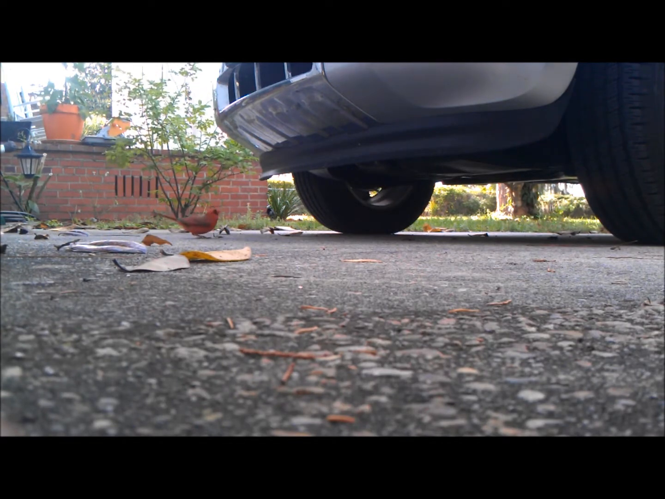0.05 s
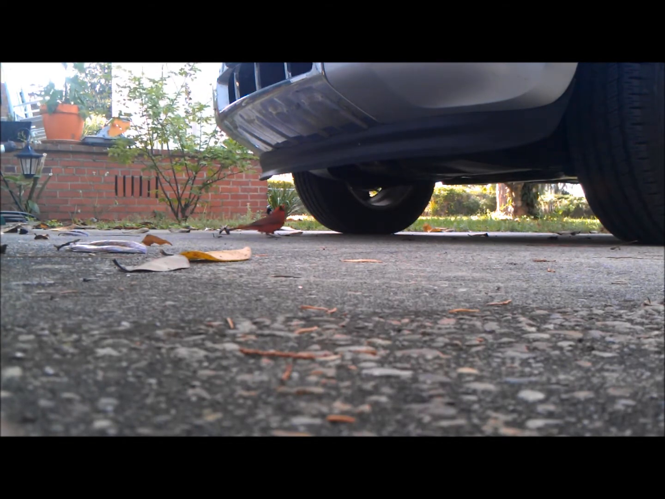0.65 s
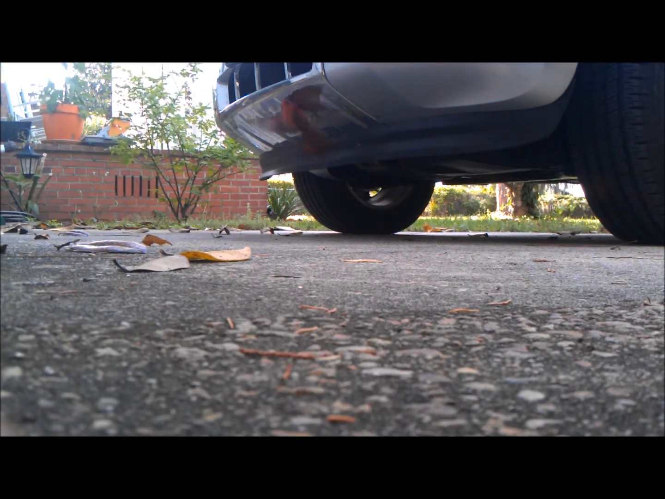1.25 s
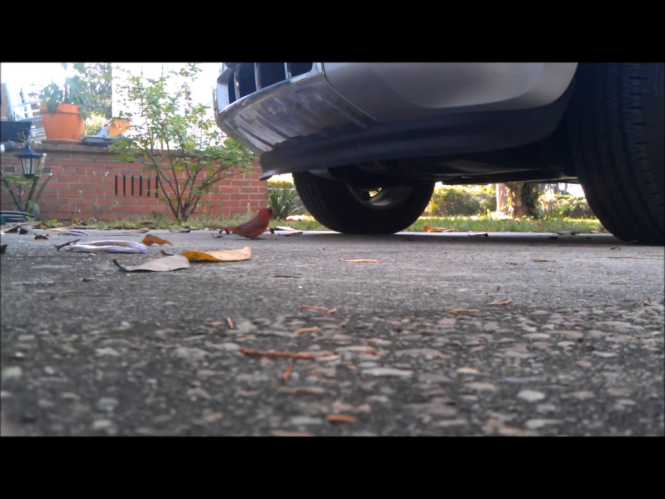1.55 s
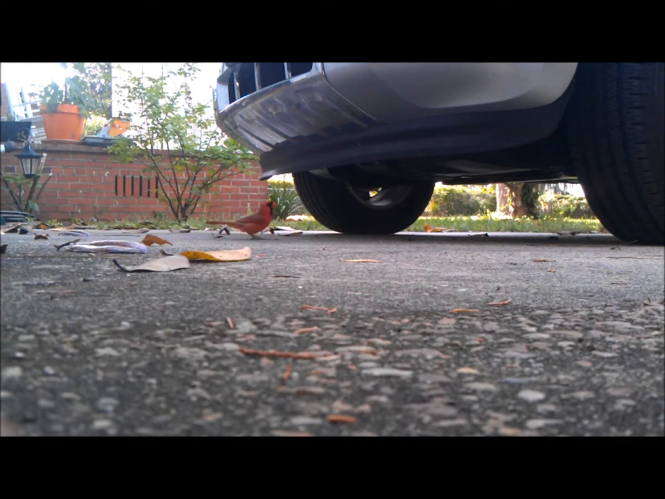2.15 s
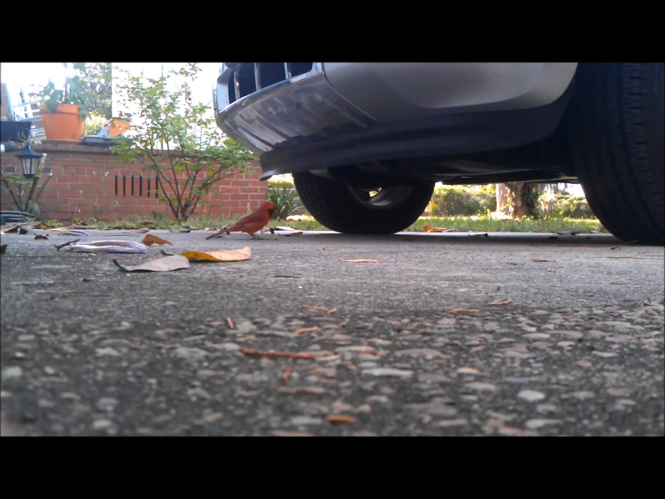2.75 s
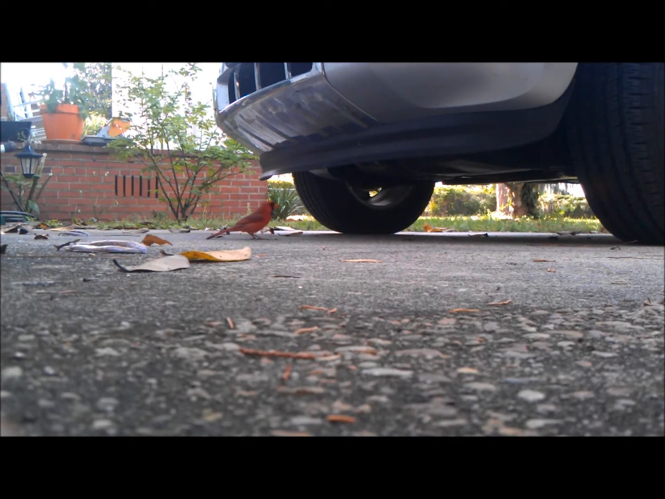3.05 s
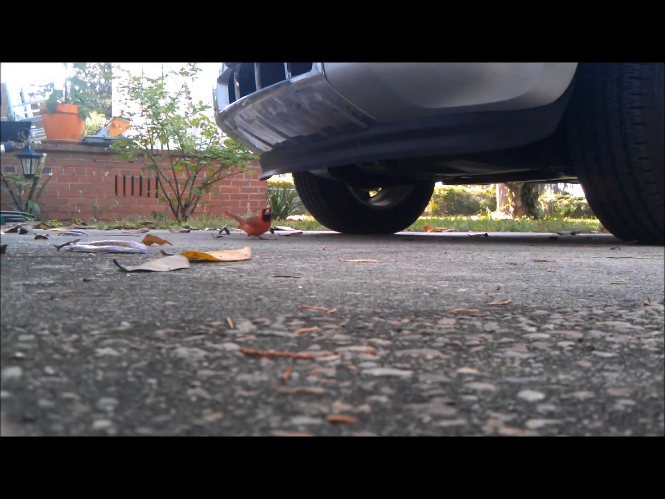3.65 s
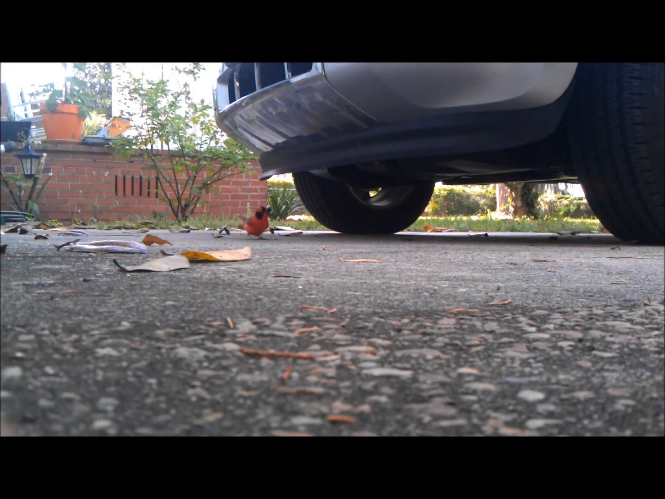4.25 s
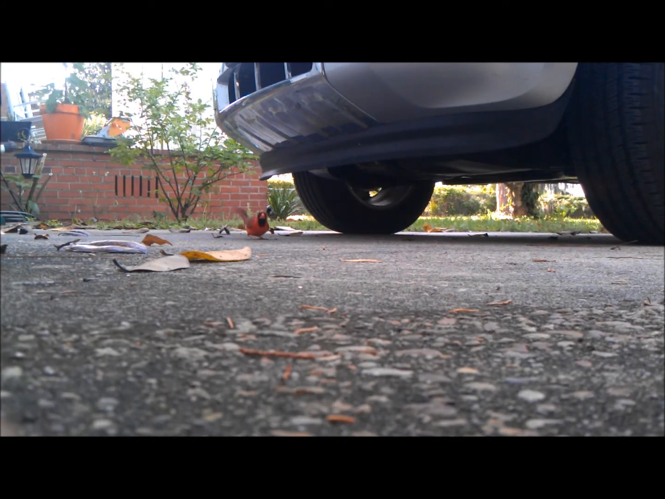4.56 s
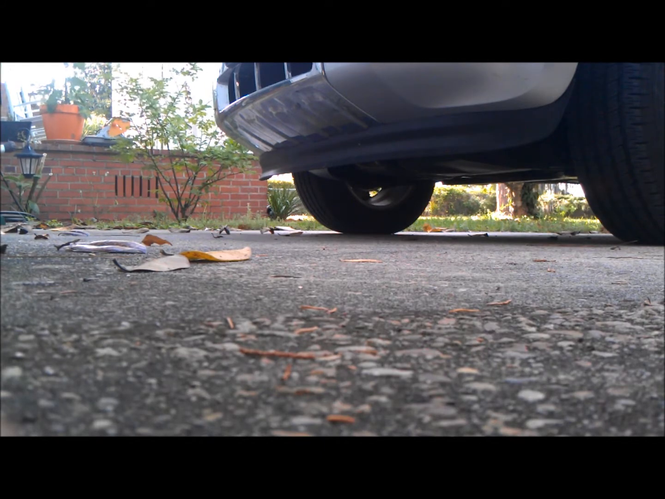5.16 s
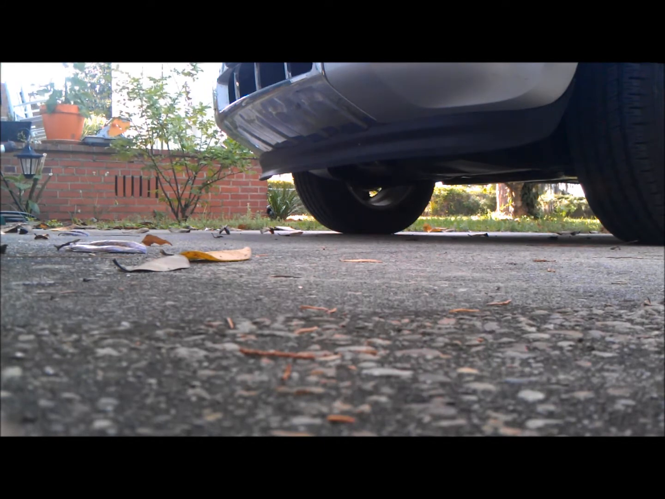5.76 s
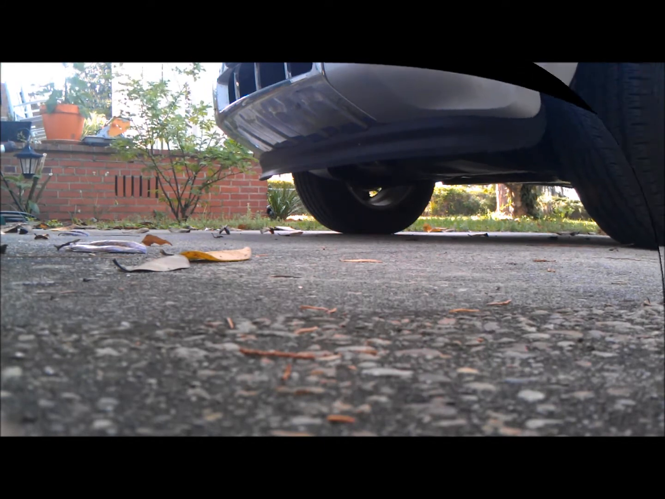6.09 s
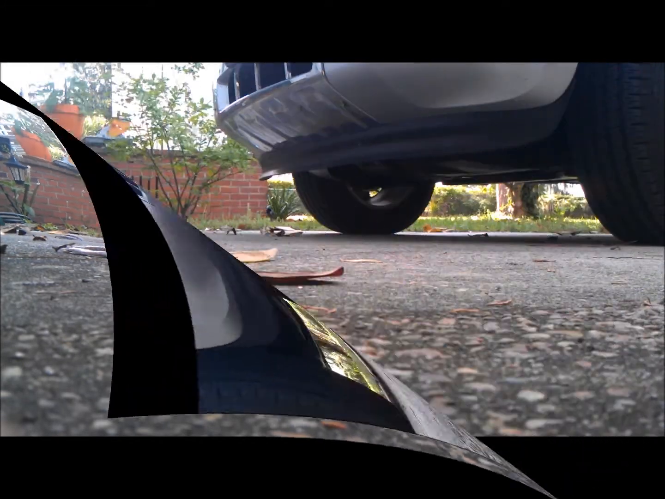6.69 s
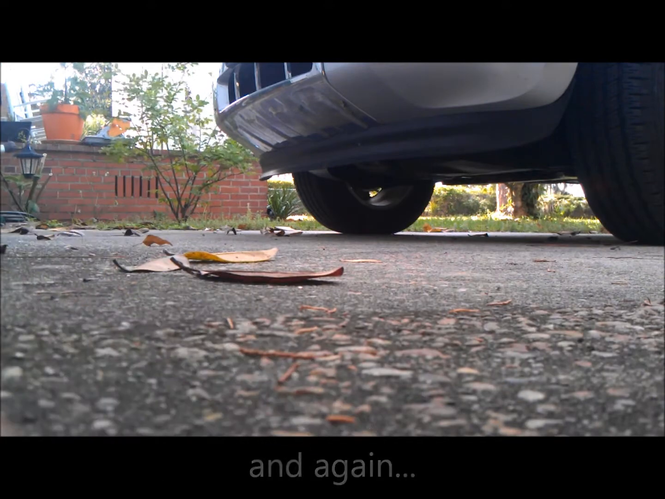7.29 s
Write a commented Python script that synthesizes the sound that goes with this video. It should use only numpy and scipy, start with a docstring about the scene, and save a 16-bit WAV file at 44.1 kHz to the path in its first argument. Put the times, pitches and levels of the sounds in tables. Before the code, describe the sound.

In a driveway, heard from the ground, low handling bumps open on the microphone and a bird gives one loud, sharp chip. Small birds twitter thinly while a beak knocks once on a plastic car bumper. A hoarse, mewing bird calls twice. Later, soft wingbeats flutter away and far birds call briefly, over a low rumble, light wind puffs and a hush of distant traffic.

```python
"""A cardinal whistles one sharp chip, strikes a car's plastic bumper and later flutters off.
Heard from the ground in a driveway: the beak sets the panel ringing, the wings push air and brush
feather on feather. Small birds twitter, a catbird-like mew sounds twice, hoarse from the two sides
of the syrinx drifting apart, and far birds call through their echoes. Low thumps on the microphone,
handling bumps at first and then puffs of wind, sit over a rumble and a hush of distant traffic."""
import sys
import numpy as np
from scipy import signal
from scipy.fft import rfft, irfft, next_fast_len
from scipy.io import wavfile
from scipy.ndimage import map_coordinates

SR = 44100
rng = np.random.default_rng(int(sys.argv[2]) if len(sys.argv) > 2 else 0)


def bounce(signal):
    """Save signal as a 16-bit WAV file at the path given by the first command-line argument."""
    frames = np.transpose(np.atleast_2d(signal))
    limited = np.clip(frames, -1, 1)
    pcm = np.round(limited * 32767).astype(np.int16)
    wavfile.write(sys.argv[1], SR, pcm)


N = 332073


def amp(db):
    """Decibels to gain."""
    return 10 ** (np.asarray(db) / 20)


def unit(x):
    """Scale to rms 1."""
    return x / np.sqrt(np.mean(x ** 2) + 1e-20)


def along(points, hz):
    """Read an EQ curve at hz, on a log frequency axis."""
    f, db = np.transpose(points)
    return np.interp(np.log(hz + 1), np.log(f + 1), db)


def curves(rows):
    """Breakpoints to automation: one curve for each column after the time."""
    times, *columns = np.transpose(rows)
    return [np.interp(np.arange(N) / SR, times, column) for column in columns]


def clock(length):
    """Sample times of a short sound."""
    return np.arange(int(length * SR)) / SR


def add(track, s, sound):
    """Mix a sound into a track at s seconds."""
    room = track[max(0, round(s * SR)):][:len(sound)]
    room += sound[:len(room)]


def wobble(rate):
    """Smooth random modulation, rate knots a second."""
    knots = rng.standard_normal(int(N * rate / SR) + 4)
    return map_coordinates(knots, [np.arange(N) * rate / SR])


def noise(spectrum, size=N):
    """Coloured noise of rms 1."""
    m = next_fast_len(size + 8192)
    eq = amp(along(spectrum, np.fft.rfftfreq(m, 1 / SR)))
    return unit(irfft(rfft(rng.standard_normal(m)) * eq, m)[:size])


def burst(spectrum, length):
    """Noise that swells fast and fades, with the energy of rms 1 held for length seconds."""
    u = clock(.25) / length
    shaped = noise(spectrum, size=len(u)) * u ** 2 * np.exp(-4 * u)
    return shaped * np.sqrt(length * SR / np.sum(shaped ** 2))


def reverb(x, t60, delay):
    """Wet signal only: a diffuse tail of unit energy after a pre-delay."""
    t = clock(1)
    tail = rng.standard_normal(len(t)) * amp(-60 * t / t60) * (t > delay)
    return signal.fftconvolve(x, tail / np.linalg.norm(tail))[:N]


def glides(rows, rough):
    """Short sliding whistles whose pitch and level tremble."""
    out, tremble, flicker = np.zeros(N), wobble(700), amp(2.2 * wobble(400))
    for s, start_hz, end_hz, length, db in rows:
        u = clock(length) / length
        at = round(s * SR) + np.arange(len(u))
        hz = start_hz * (end_hz / start_hz) ** u * (1 + rough * tremble.take(at, mode="clip"))
        phase = 2 * np.pi * np.cumsum(hz) / SR
        swell = np.sqrt(np.sin(np.pi * u))
        add(out, s, amp(db) * swell * (np.sin(phase) + amp(-27) * np.sin(2 * phase)))
    return out * flicker


# fader ride of the rumble: t/s, relative level/dB
RUMBLE_RIDE = [(0.0, -40.5), (0.17, -37.5), (0.27, -39.5), (0.4, -46.5), (0.58, -50), (1.7, -55.5),
               (2.12, -51.5), (2.56, -54.5), (2.87, -53.5), (3.58, -60), (5.22, -64.5), (6.5, -67),
               (7.09, -64), (7.53, -64)]
# low thumps, handling bumps up to 0.45 s and then wind: t/s, level/dB, length/s
THUMP_CUES = [(0.091, -26.5, 0.017), (.118, -28, 0.027), (.198, -29.5, 0.014), (0.296, -29, 0.013),
              (0.376, -35, 0.014), (0.408, -34.5, 0.044), (0.439, -33.5, 0.022), (0.592, -39.5, 0.03),
              (0.854, -32, .011), (0.909, -37, 0.025), (1.237, -42.5, 0.041), (1.63, -41.5, .026),
              (2.03, -46, 0.025), (2.109, -46.5, 0.02), (2.37, -45.5, 0.025), (2.914, -45.5, .02),
              (2.985, -48, 0.019), (3.882, -48.5, 0.021), (6.831, -51.5, .02)]
# bass-heavy colours of the rumble and of a thump: f/Hz, level/dB
RUMBLE_EQ = [(20, -41.5), (45, -21.5), (75, -5), (125, 3), (185, -1), (270, -9.5), (400, -22), (800, -41.5),
             (2000, -79.5)]
THUMP_EQ = [(25, -59.5), (55, -25), (90, -9.5), (135, 5), (200, 2), (280, -6.5), (400, -19), (800, -46.5),
            (2000, -85.5)]

def handling_and_wind(trim_db=2, lumpy_db=3):
    """Low thumps on the microphone: handling bumps at first, then puffs of wind, over a lumpy rumble."""
    ride_db, = curves(RUMBLE_RIDE)
    rumble = unit(noise(RUMBLE_EQ) * amp(lumpy_db * wobble(22)))
    out = amp(ride_db + trim_db) * rumble
    for s, db, length in THUMP_CUES:
        add(out, s, amp(db) * burst(THUMP_EQ, length))
    return out


# fader rides of the bed: t/s, relative traffic level/dB, relative hiss level/dB
BED_RIDE = [(0.0, -53.5, -68.5), (0.73, -53.5, -65), (3.12, -55.5, -67), (3.42, -57.5, -70.5),
            (4.78, -61, -72.5), (5.41, -61, -70), (5.62, -64, -74.5), (5.98, -66.5, -78.5),
            (6.58, -67.5, -80), (7.34, -62.5, -76), (7.53, -60.5, -73)]
# colours of the dull traffic and the airy hiss: f/Hz, level/dB
TRAFFIC_EQ = [(120, -29), (200, -5), (317, -7.5), (504, -5.5), (671, -6), (953, -6), (2860, -15.5),
              (3930, -21), (5760, -23), (9000, -30.5), (11700, -60), (19800, -120)]
HISS_EQ = [(3000, -11.5), (6000, -1), (9000, -5), (10450, 6.5), (11200, -2), (13000, -2), (14000, 1.5),
           (14700, -5), (15800, -5.5)]

def traffic_bed(traffic_trim_db=1, hiss_trim_db=2):
    """Distant traffic under a fine hiss; both sink slowly and come back up a little."""
    traffic_db, hiss_db = curves(BED_RIDE)
    traffic = amp(traffic_db + traffic_trim_db + .4 * wobble(4.7)) * noise(TRAFFIC_EQ)
    hiss = amp(hiss_db + hiss_trim_db) * noise(HISS_EQ)
    return traffic + hiss


# pitch arch and envelope, one list for each mew: t/s, f/Hz, relative level/dB
MEW_CONTOURS = [
    [(.39, 1080, -71), (.445, 1298, -42.5), (.49, 1302, -43), (.57, 1290, -40), (.62, 1237, -45),
     (.67, 1163, -43), (.71, 1106, -49), (.75, 1040, -62)],
    [(2.88, 1030, -67), (2.94, 1160, -52.5), (2.98, 1197, -47.5), (3.035, 1257, -44.5), (3.1, 1210, -58),
     (3.15, 1180, -41.5), (3.2, 1132, -50), (3.26, 1004, -59)],
]
# formants of the mewing bird's throat: f/Hz, level/dB
THROAT_EQ = [(1300, -40), (2300, -4), (2700, -5.5), (3750, -8.5), (4900, 0), (6100, -19), (8400, -23),
             (11000, -27)]

def mews():
    """Hoarse cries with a raspy attack: the two sides of the syrinx drift apart in one throat."""
    out, t = np.zeros(N), np.arange(N) / SR
    rasp_eq = [(1500, -30), (2500, -2), (6500, -2.5), (8500, -8.5), (12000, -26)]
    for contour in MEW_CONTOURS:
        pitch, db = curves(contour)
        start, end = contour[0][0], contour[-1][0]
        gate = (t > start) & (t < end)
        for drift, side_db in [(.003, 0), (.04, -3.5)]:  # steady side, wandering side
            hz = (pitch * (1 + drift * wobble(16) + .009 * wobble(600)))[gate]
            phase = 2 * np.pi * np.cumsum(hz) / SR
            effort = amp(db + side_db + 3 * wobble(80))[gate]
            voice = sum(amp(along(THROAT_EQ, k * hz)) * np.sin(k * phase) for k in range(1, 9))
            out[gate] += effort * voice
        add(out, start + .017, amp(-52) * burst(rasp_eq, length=.06))
    return amp(-7) * out + amp(-9) * reverb(out, t60=.35, delay=.018)


# sweep and envelope of the chip: t/s, f/Hz, level/dB
CHIP_CONTOUR = [(0.5265, 5330, -48.5), (.528, 6380, -12), (.529, 7030, -7), (0.5307, 7800, -13.5),
                (.532, 7880, -17), (0.535, 8650, -18), (0.538, 8610, -43)]
# its second harmonic against the fundamental: f/Hz, level/dB
OVERTONE_EQ = [(10600, -9), (11800, -26), (12500, -24.5), (13800, -25), (15000, -16)]

def cardinal_chip():
    """A thin tick opens a fast upward whistle that bounces between paving and car underside."""
    hz, db = curves(CHIP_CONTOUR)
    t = np.arange(N) / SR
    start, end = CHIP_CONTOUR[0][0], CHIP_CONTOUR[-1][0]
    gate = (t > start) & (t < end)
    phase = 2 * np.pi * np.cumsum(hz) / SR
    overtone = amp(along(OVERTONE_EQ, 2 * hz)) * np.sin(2 * phase)
    note = amp(db) * gate * (np.sin(phase) + overtone)
    tick_eq = [(8000, -38.5), (9800, -11), (10600, 4), (11700, -22), (12500, -5.5), (16000, -14.5)]
    add(note, start, amp(-38.5) * burst(tick_eq, length=.0034))
    early = amp(2) * reverb(note, t60=.11, delay=.004)
    tail = amp(-16.5) * reverb(note, t60=.37, delay=.02)
    return note + early + tail


# twitter notes: t/s, start f/Hz, length/s, level/dB
TWITTER_CUES = [(0.748, 6840, .015, -41), (0.854, 6770, 0.018, -43.5), (0.977, 6220, 0.028, -45.5),
                (1.117, 5360, 0.027, -53.5), (1.32, 6840, 0.009, -43), (1.372, 7540, 0.0099, -37),
                (1.449, 7040, 0.0088, -34.5), (1.557, 6800, 0.015, -42), (1.734, 6050, 0.0097, -45),
                (1.788, 7180, 0.013, -39.5), (1.808, 7500, .014, -43), (1.885, 7100, 0.025, -42.5),
                (1.91, 7140, .024, -45), (1.986, 5570, 0.014, -47.5), (2.032, 5750, 0.029, -44.5),
                (2.057, 5840, 0.022, -46), (2.16, 4480, 0.009, -57), (2.253, 4400, .01, -58)]

def twitter(fall_octaves=.47, typical_hz=6440, fall_exponent=1.213):
    """Thin, scratchy falling notes from the shrubs, with a slapback from the brick wall."""
    rows = []
    for s, hz, length, db in TWITTER_CUES:
        octaves = fall_octaves * (hz / typical_hz) ** fall_exponent  # higher notes fall further
        rows.append((s, hz, hz / 2 ** octaves, length, db))
    notes = glides(rows, rough=.018)
    out = notes + amp(-6.5) * reverb(notes, t60=.32, delay=.002)
    add(out, .033, amp(-12) * notes)  # slapback
    return out


# modes of the plastic panel: f/Hz, relative level/dB, t60/s
BUMPER_MODES = [(177, -11, .25), (230, -11, .18), (290, -14, .14), (327, -13, .14), (390, -14, .12),
                (500, -1.5, .14), (565, -10, .13), (650, -11, .13), (711, -8, .14), (785, -9, .14),
                (863, -8, .14), (912, -7, .14), (964, -4, .15), (1214, -3, .12), (1303, -8, .12),
                (1408, -5, .13), (1467, -3.5, .14), (1532, -7, .13), (1998, -5, .13), (2116, -7, .07),
                (2318, -8, .1), (2546, -11, .1), (2643, -11, .14), (2935, -11, .15)]
# colour of the crack and the rattle: f/Hz, level/dB
CRACK_EQ = [(100, -28), (190, -25.5), (400, -1.5), (900, -5.5), (1400, -7), (2200, 0.5), (3700, -9.5),
            (5700, 0), (7500, -5), (10600, -11.5), (13500, -27.5), (16000, -43.5)]

def bumper_knock(hit_s=1.3872, ring_db=-22, crack_db=-13, rattle_db=-19.5):
    """The beak hits the bumper: a crack, the panel's modes and a dense rattle between them."""
    t, out = clock(.6), np.zeros(N)
    ring = sum(amp(db - 60 * t / t60) * np.sin(2 * np.pi * (hz * t + rng.random()))
               for hz, db, t60 in BUMPER_MODES)
    crack = noise(CRACK_EQ, size=len(t)) * amp(crack_db - 60 * t / .045)
    rattle = noise(CRACK_EQ, size=len(t)) * amp(rattle_db - 60 * t / .14)
    attack = 1 - np.exp(-t / .00018)
    add(out, hit_s, (amp(ring_db) * ring + crack + rattle) * attack)
    return out + amp(-19) * reverb(out, t60=.23, delay=.025)


# wingbeats: t/s, swish level/dB, flap level/dB
WINGBEAT_CUES = [(4.895, -63, -62), (4.946, -67, -60), (4.974, -64.5, -58), (5.097, -64, -66),
                 (5.133, -61.5, -57.5), (5.251, -58, -71), (5.287, -55, -50.5), (5.324, -54, -71),
                 (5.376, -55.5, -57), (5.416, -56, -51.5), (5.462, -61, -56), (5.512, -61, -75.5),
                 (5.602, -64, -60.5), (5.785, -74, -63.5)]
# wing-tip flicks: t/s, level/dB
FLICK_CUES = [(4.923, -53.5), (5.297, -51.5), (5.346, -49)]
# colours of the bright swish, the midrange flap and the low push of air: f/Hz, level/dB
FEATHER_EQ = [(300, 1.5), (1000, -2), (2500, -3.5), (3300, 2), (4300, -2.5), (6000, -1), (10000, -3),
              (15500, -3)]
FLAP_EQ = [(150, -8), (400, 4), (800, 2.5), (1500, -1), (2500, -10), (3500, -9.5), (6000, -40)]
PUSH_EQ = [(40, -19), (90, -4), (160, 11), (270, 2), (450, -9), (1200, -37), (4000, -64)]

def wings(stroke_s=.02, firm_flap_db=-55.5, push_ratio=1.9, rustle_db=-66):
    """Each stroke pushes air, snaps the wing taut and brushes the feathers; at times a tip flicks."""
    t, body = np.arange(N) / SR, np.zeros(N)
    rustle_swell = np.exp(-((t - 5.42) / .15) ** 2)  # under the busiest flutter
    swish = amp(rustle_db) * rustle_swell * noise(FEATHER_EQ)
    for s, swish_db, flap_db in WINGBEAT_CUES:
        # harder flaps push far more air
        push_db = firm_flap_db + .5 + push_ratio * (flap_db - firm_flap_db)
        add(swish, s, amp(swish_db) * burst(FEATHER_EQ, stroke_s))
        add(body, s, amp(flap_db) * burst(FLAP_EQ, stroke_s))
        add(body, s, amp(push_db) * burst(PUSH_EQ, stroke_s))
    for s, db in FLICK_CUES:
        add(swish, s, amp(db) * burst(FEATHER_EQ, length=.008))
    grain = amp(2.5 * wobble(900))
    strokes = swish * grain + body
    return strokes + amp(-7) * reverb(strokes, t60=.18, delay=.0055)


# far calls: t/s, start f/Hz, end f/Hz, length/s, relative level/dB
FAR_CALL_CUES = [(6.172, 3950, 2860, 0.035, -54.5), (6.18, 2865, 2250, 0.086, -50.5),
                 (7.325, 2102, 1530, 0.022, -49), (7.376, 3130, 2473, 0.014, -35),
                 (7.385, 2734, 2390, 0.031, -36.5), (7.425, 2460, 1910, .025, -50.5),
                 (7.478, 1380, 2110, 0.013, -42)]

def far_birds():
    """Distant calls arrive mostly as echoes from the trees."""
    calls = glides(FAR_CALL_CUES, rough=.025)
    return amp(-12) * (.72 * calls + reverb(calls, t60=.38, delay=.0011))


def scene():
    """The mono mix: every layer at one microphone."""
    bed = handling_and_wind() + traffic_bed()
    return (bed + mews() + cardinal_chip() + twitter() + bumper_knock() + wings() + far_birds())[None]


def record(dry):
    """A brick-wall low-pass takes the very top off the mix."""
    cutoff_hz = 15800
    m = next_fast_len(N + SR // 2)
    gain = 1 / np.sqrt(1 + (np.fft.rfftfreq(m, 1 / SR) / cutoff_hz) ** 240)
    return irfft(rfft(dry, m) * gain, m)[..., :N]


dry = scene()
out = record(dry)
bounce(out)
```